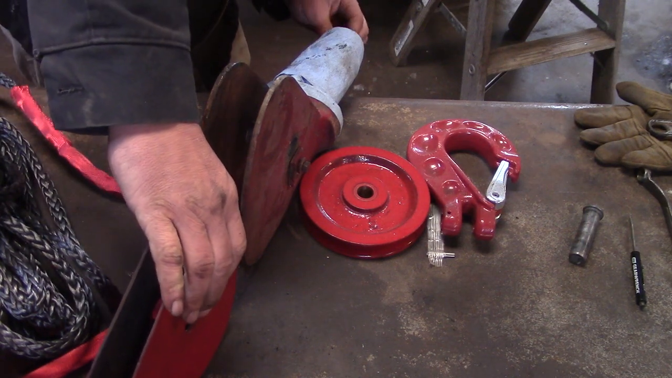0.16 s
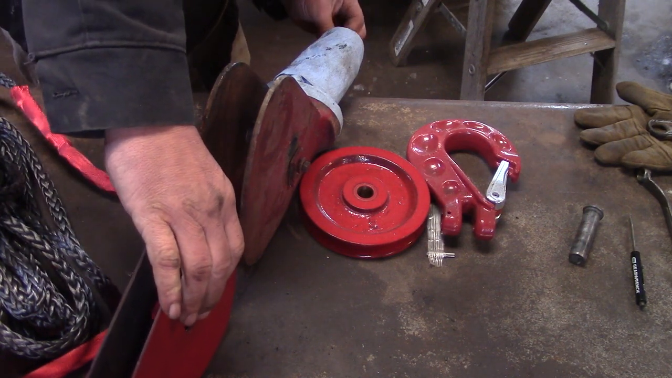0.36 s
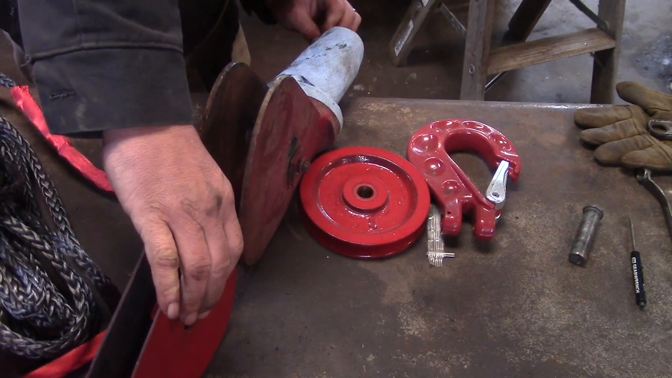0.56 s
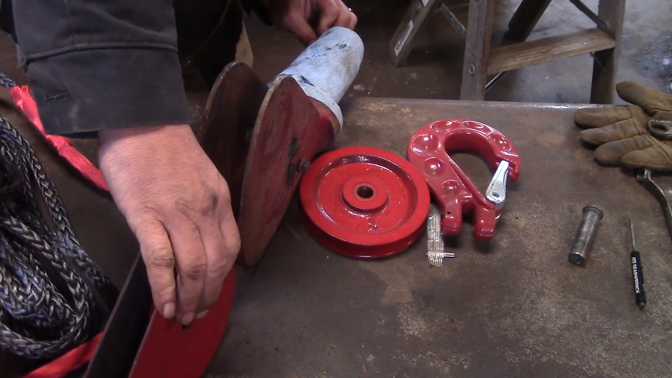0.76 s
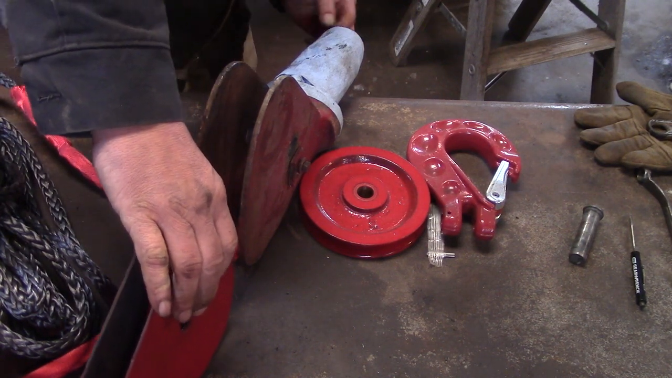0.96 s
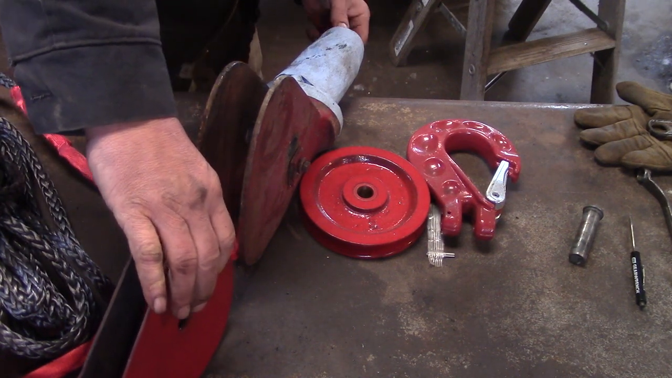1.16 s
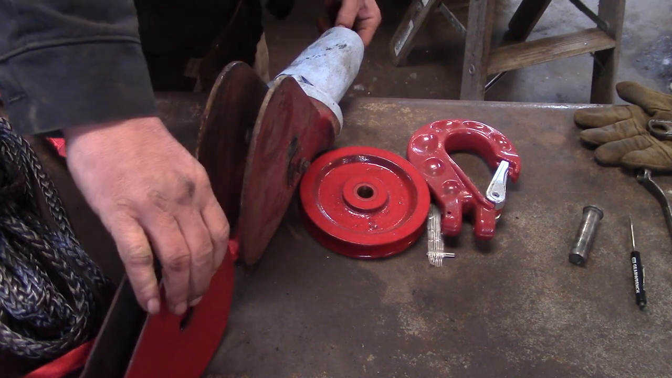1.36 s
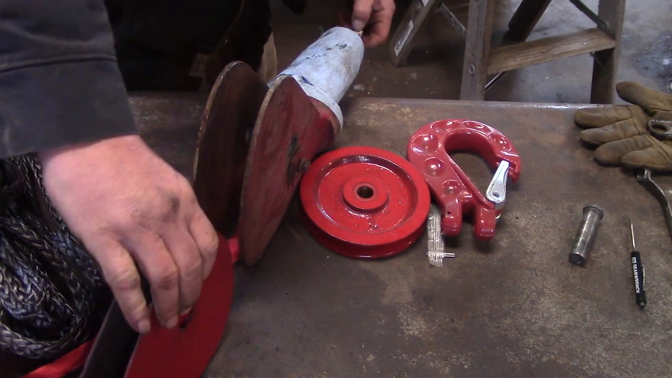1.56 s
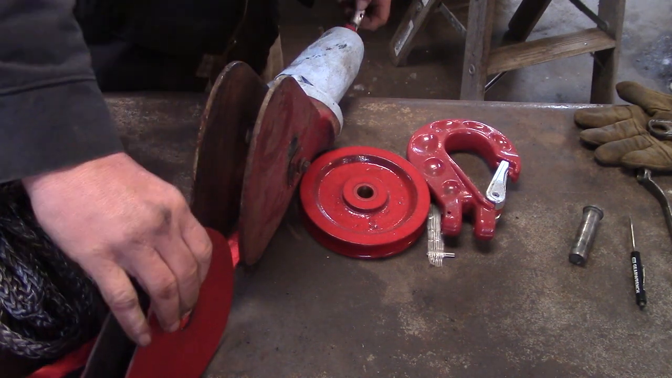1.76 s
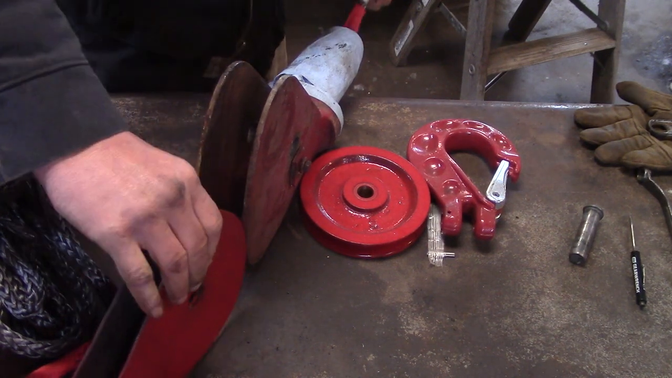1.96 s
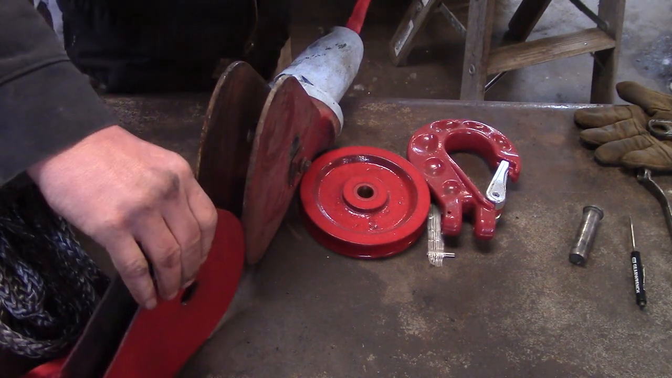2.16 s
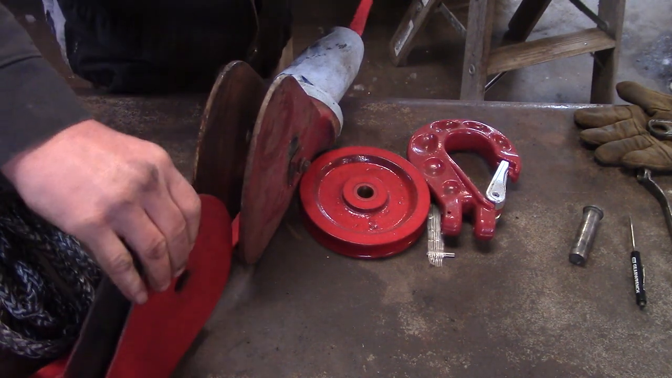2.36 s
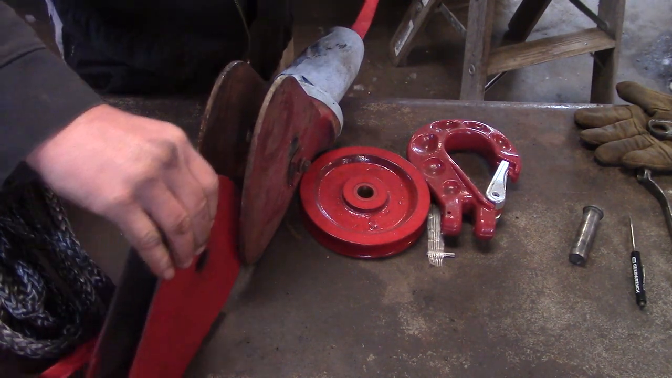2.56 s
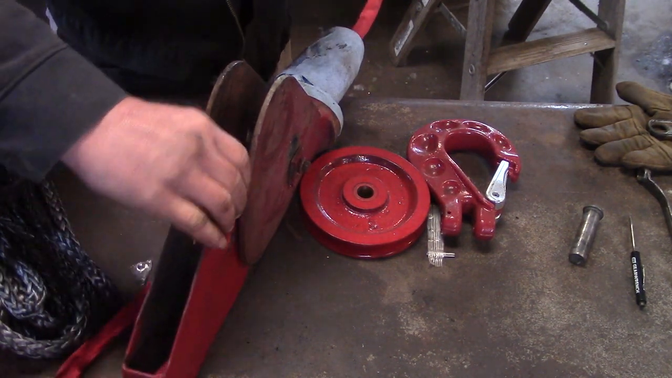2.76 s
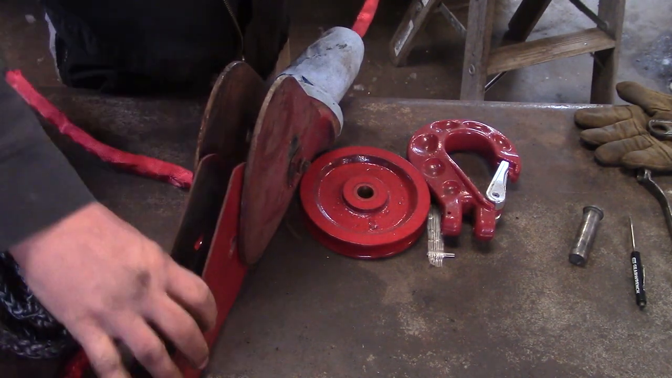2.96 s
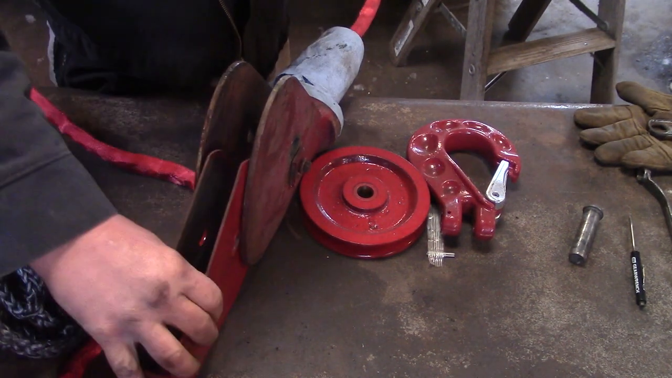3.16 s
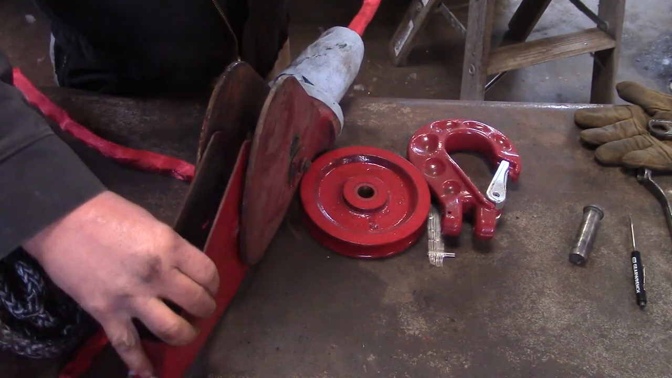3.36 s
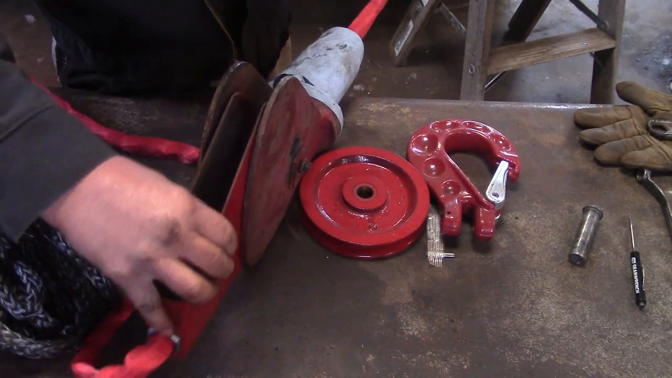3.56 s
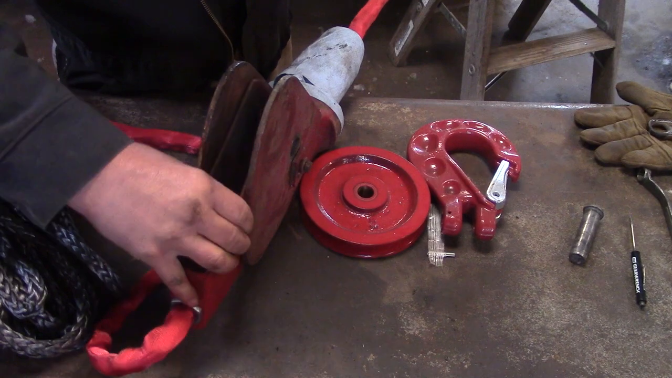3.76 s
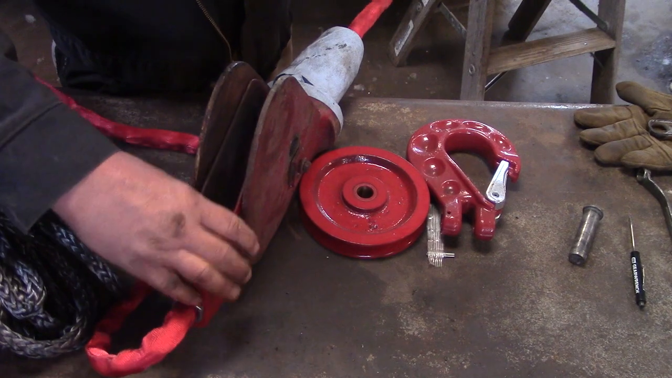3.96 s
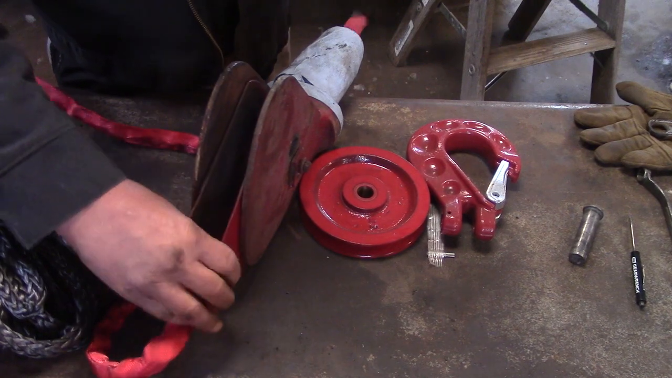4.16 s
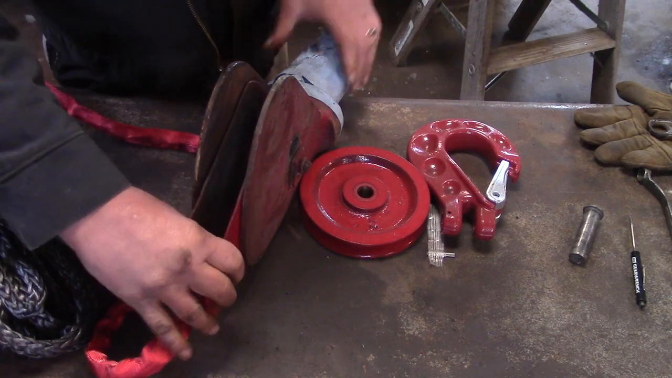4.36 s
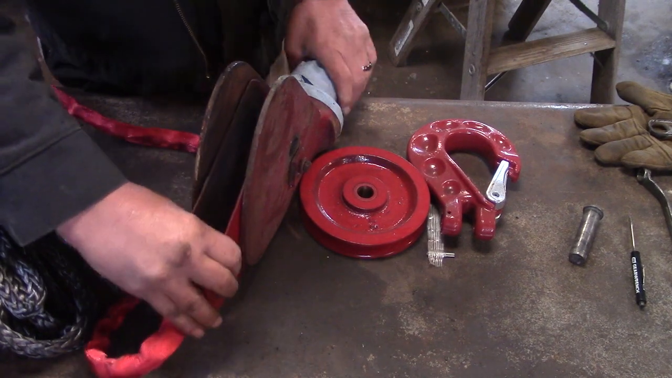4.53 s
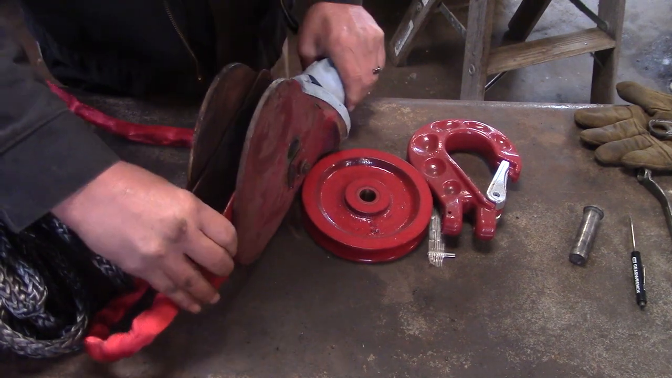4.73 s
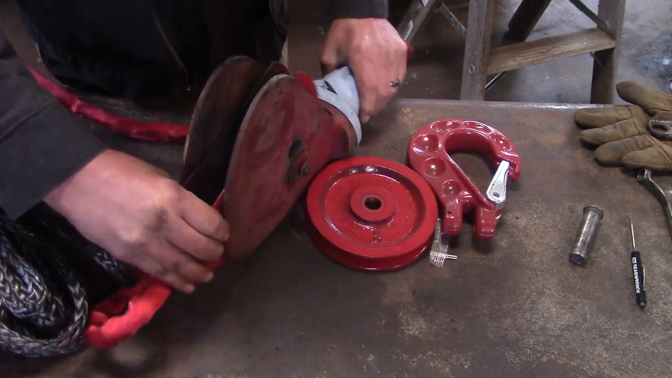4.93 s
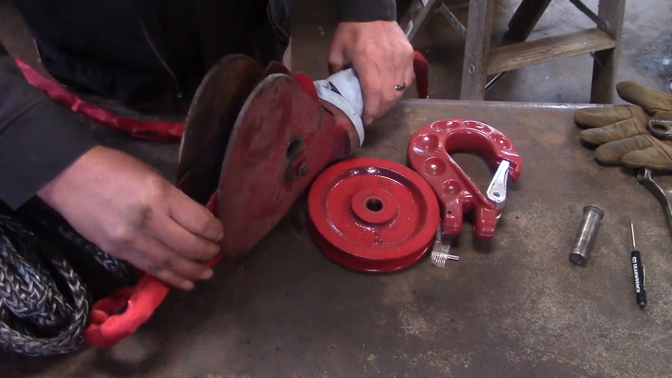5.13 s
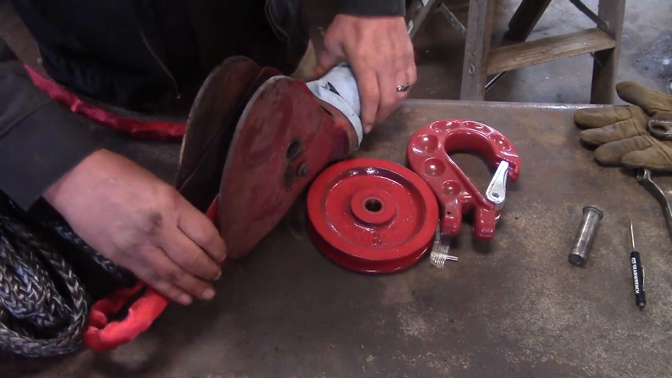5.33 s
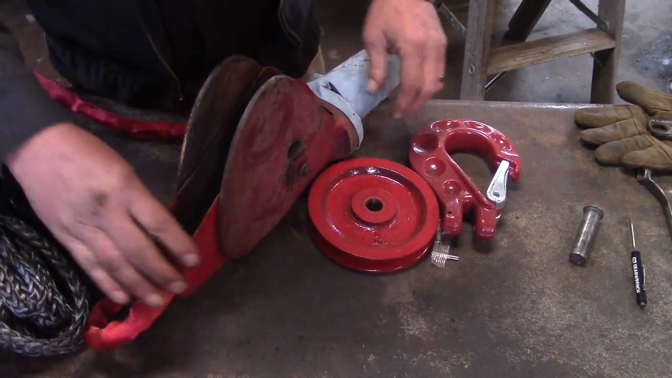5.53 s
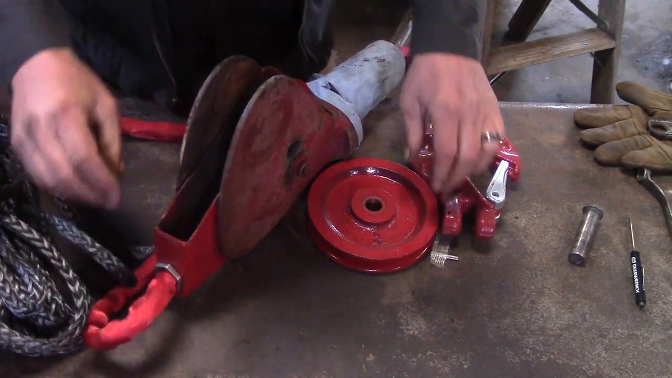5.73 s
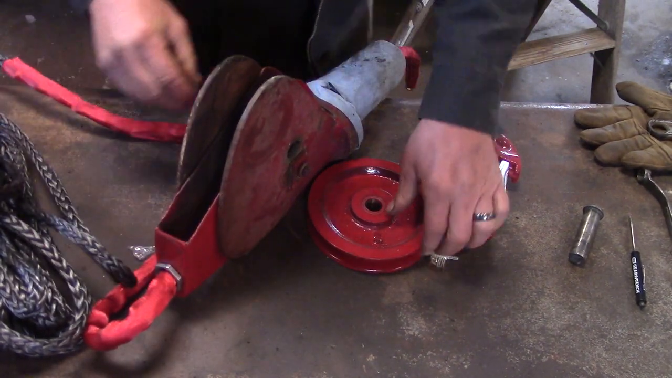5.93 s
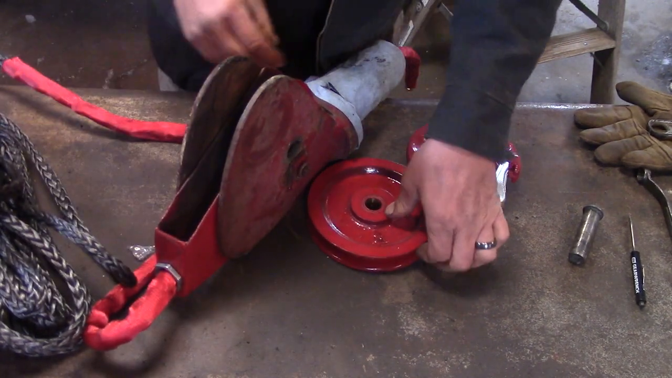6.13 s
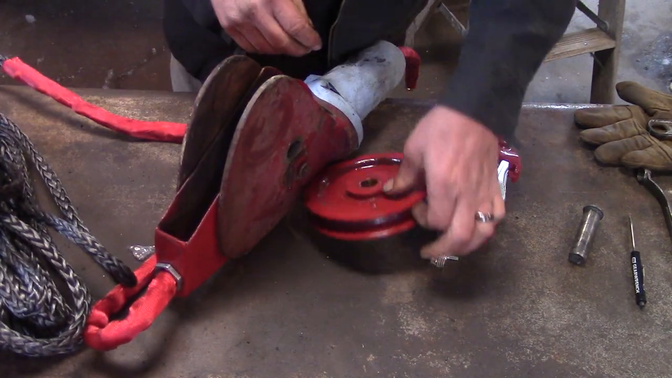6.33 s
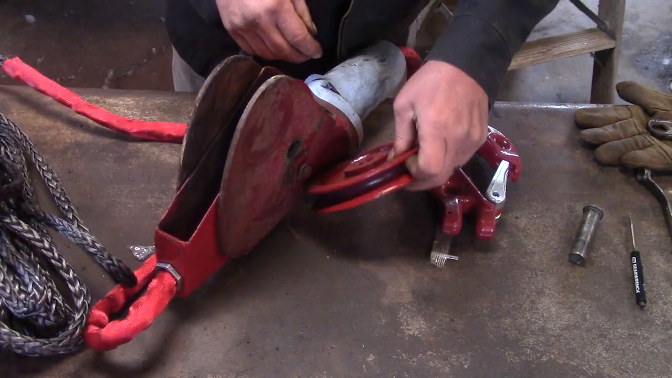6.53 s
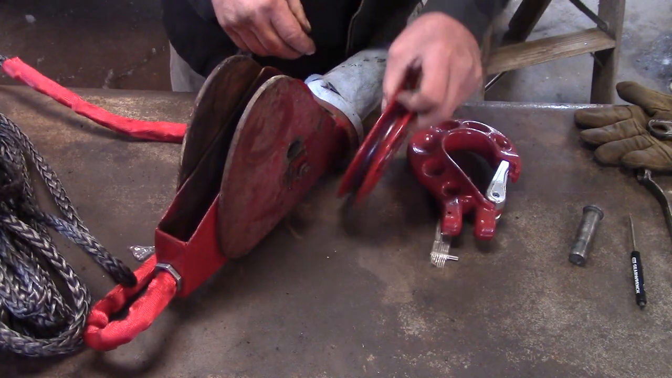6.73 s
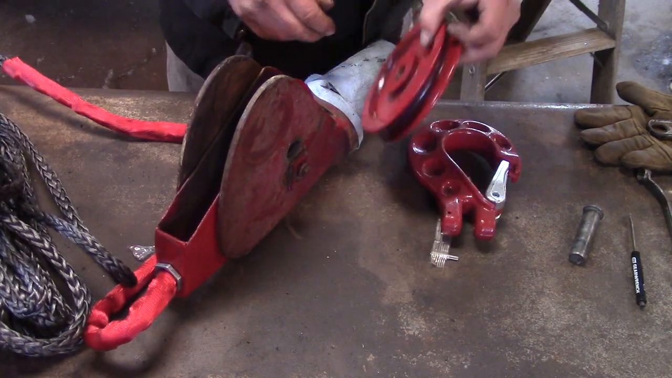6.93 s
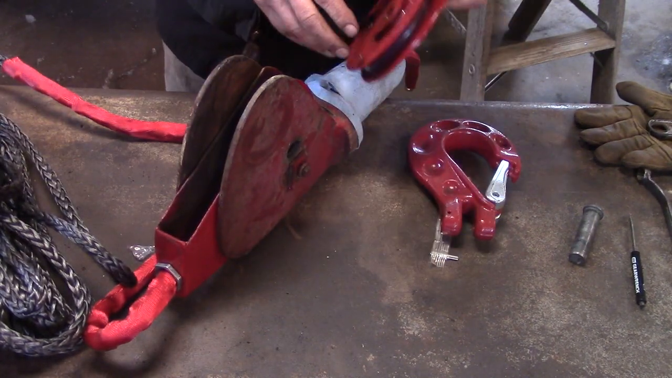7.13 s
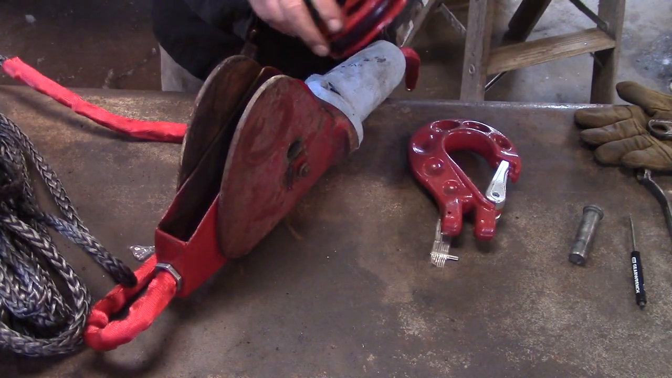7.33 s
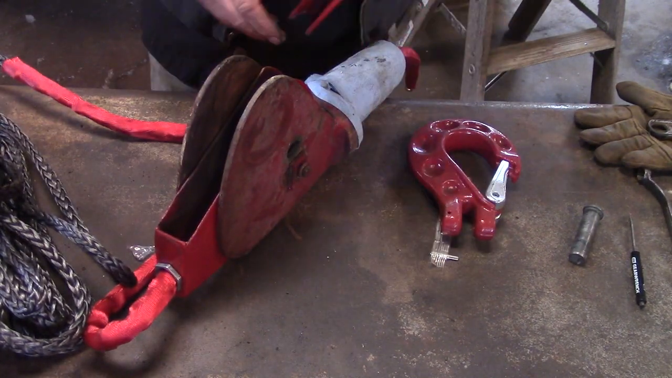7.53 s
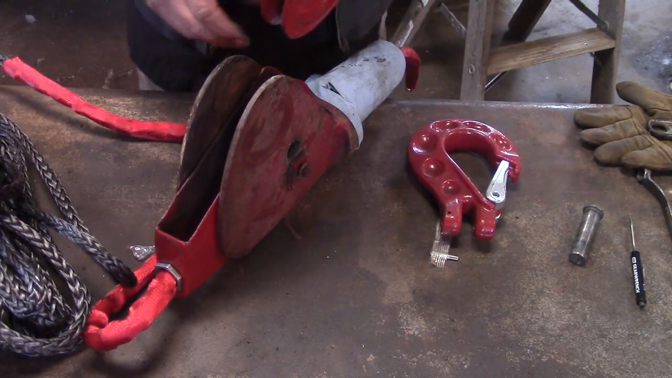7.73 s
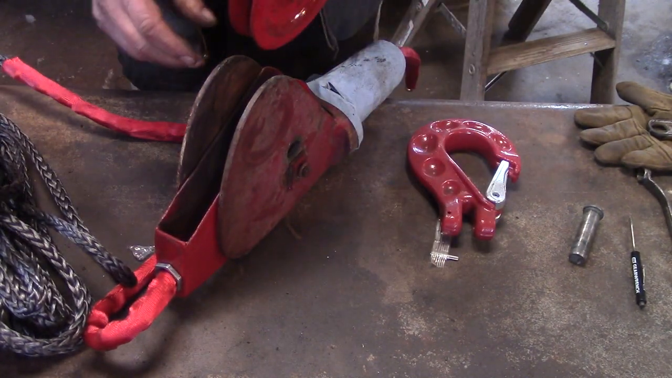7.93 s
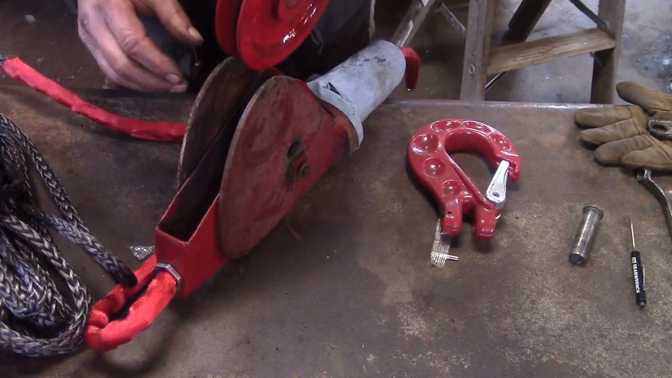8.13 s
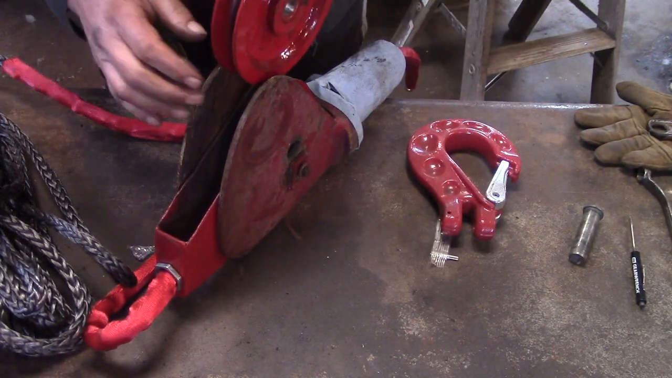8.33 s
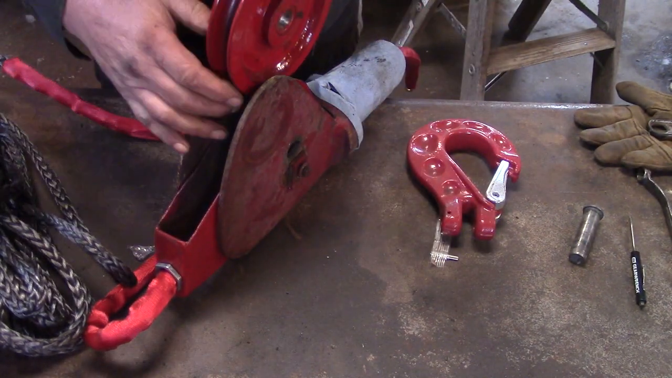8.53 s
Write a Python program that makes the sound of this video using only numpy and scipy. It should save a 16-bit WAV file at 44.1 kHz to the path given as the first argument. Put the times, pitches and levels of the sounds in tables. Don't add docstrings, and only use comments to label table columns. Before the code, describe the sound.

Steel rigging parts scrape and clang together on a steel bench in a quiet workshop, then a pulley wheel slides, squeaks briefly and lifts with clinks.

```python
import sys
import numpy as np
from scipy import signal
from scipy.fft import rfft, irfft
from scipy.io import wavfile
from scipy.ndimage import uniform_filter1d

SR = 44100
rng = np.random.default_rng(int(sys.argv[2]) if len(sys.argv) > 2 else 0)


def field_ratio(decibels):
    return 10 ** (np.asarray(decibels, dtype=float) / 20)


def to_wav(sig):
    pcm = np.clip(np.atleast_2d(sig), -1, 1) * 32767
    pcm = np.round(pcm).astype(np.int16)
    wavfile.write(sys.argv[1], SR, pcm.T)


N = 378819

# f/Hz, level/dB per Hz
AIR_SPECTRUM = [(30, -23.5), (200, -4), (700, -5), (2850, -16.5), (3930, -18), (9300, -28.5),
                (11800, -29.5), (15400, -33.5), (15800, -61)]
# f/Hz, side minus mid level/dB
AIR_WIDTH = [(60, -8.5), (180, -9.5), (550, -9), (1650, -11), (4970, -11), (15000, -19)]
# t/s, weight level/dB, sliding speed level/dB
DRAGS = [
    [(0.0, -61, -72), (.366, -50, -70), (.576, -83, -69), (.922, -89, -73), (1.118, -55, -74),
     (1.58, -57.5, -69), (1.66, -62.5, -57), (1.8, -63.5, -60)],
    [(1.82, -68.5, -63.5), (1.94, -33.5, -42), (2.09, -30, -49), (2.41, -51.5, -76.5)],
    [(2.57, -24.5, -58.5), (2.66, -26, -34), (2.74, -20, -29.5), (2.86, -15, -42), (3.0, -30.5, -48.5),
     (3.5, -43, -56)],
    [(3.78, -36.5, -52.5), (4.07, -40, -54.5), (4.17, -30, -59.5), (4.32, -45.5, -69), (4.49, -71, -58)],
    [(4.52, -50.5, -54.5), (4.922, -30.5, -45), (5.1, -28.5, -38.5), (5.2, -39.5, -55.5),
     (5.308, -24.5, -43.5), (5.44, -48, -66), (5.6, -82, -78)],
    [(5.62, -91, -70), (5.738, -43, -52), (5.9, -53.5, -65.5)],
    [(6.03, -56, -69.5), (6.146, -39, -47.5), (6.378, -37, -55.5), (6.502, -50, -61.5), (7.0, -53.5, -69)],
]
# f/Hz, level/dB per Hz
SCRAPE_SPECTRUM = [(290, -27), (500, 1), (914, -9.5), (1710, -3), (3250, -13), (6000, -27), (7800, -57.5),
                   (13200, -120)]
# f/Hz, level/dB per Hz
HISS_SPECTRUM = [(1760, -36.5), (3000, -4.5), (3390, 0), (8070, -4), (8820, -3), (10200, -6.5), (14700, -7),
                 (15500, -31.5)]
HIGH_HZ = [4980, 5250, 5720, 5920, 6150, 6890, 7530, 7970, 9330, 9670, 10500]
ROPE_SNAPS = [.155, .305, .51, .66, .675, .73, .78, .79, .82, .835, .845, .87]
# t/s, peak level/dB, brightness/dB per octave
TICKS = [(.331, -49, 8), (0.6508, -38.5, 3), (1.5415, -40.5, 3), (1.8933, -34, 8.5), (2.168, -29.5, 3.5),
         (2.873, -18, 11), (2.955, -18, -3), (2.8902, -15.5, -1), (2.917, -11, -5.5), (3.069, -27, 7.5),
         (3.089, -22.5, -4), (3.118, -18, -5), (4.5018, -44.5, -3.5), (4.6443, -29.5, -4),
         (4.7004, -21, 13), (4.78, -41.5, 0), (4.8156, -25.5, 1), (4.89, -26.5, 1), (4.9721, -19.5, 8.5),
         (4.997, -11, -5.5), (5.0736, -18.5, -6.5), (5.0883, -19, 4.5), (5.2295, -20, 3),
         (5.289, -9.5, 12.5), (5.309, -18, -10), (5.3914, -32, 10.5), (5.6742, -33.5, -7.5),
         (2.024, -28, 2), (2.571, -30.5, -1), (2.588, -27.5, 9), (2.688, -22, -0.5), (2.7096, -20, -10),
         (3.19, -19, -11.5), (3.29, -17.5, -5.5), (3.388, -36, 7), (3.798, -26.5, 1), (3.735, -41, 4),
         (4.252, -36, 0), (4.346, -45, 10), (5.195, -36, 1), (6.1463, -54, 0), (6.1867, -42, -1.5),
         (6.619, -52, -11)]
# t/s, peak level/dB
CLINKS = [(4.779, -27.5), (4.97, -23), (6.6616, -51), (6.775, -65), (7.2658, -53.5), (7.4341, -54),
          (6.2015, -40), (6.2356, -34), (6.269, -30.5), (6.291, -46), (6.3129, -31.5), (6.324, -32),
          (6.3653, -34), (6.392, -37), (6.428, -29), (6.441, -20), (6.473, -27.5), (6.7, -39.5),
          (6.72, -32.5), (6.738, -29), (6.245, -42), (6.277, -56), (6.335, -45), (6.345, -50), (6.377, -42),
          (6.405, -50), (6.6511, -59), (6.71, -38), (6.756, -40)]
# f/Hz, level/dB, t60/s
PIN_MODES = [(3924, 8.5, 0.032), (6170, -8, 0.049), (8760, -8, 0.09), (9810, -12, 0.067),
             (11360, -5, 0.027), (12230, -13, .03), (13400, -9.5, 0.028), (14090, -3, 0.031),
             (14900, -11.5, 0.039), (10500, -12.5, 0.036)]
# t/s, f/Hz, peak level/dB, t60/s
LIGHT_CONTACTS = [(1.895, 12400, -53.5, .3), (1.895, 6890, -45, 0.27), (1.923, 10500, -44, 0.46),
                  (1.897, 6170, -49, 0.6), (1.978, 5740, -19.5, 0.12), (1.98, 4662, -26.5, 0.29),
                  (2.024, 11400, -47, .2), (2.17, 7500, -41, 0.082), (1.9, 5350, -49, .8),
                  (2.312, 5400, -39.5, 0.16), (2.326, 8000, -49, 0.058), (2.384, 11800, -31, 0.25),
                  (2.384, 5200, -19, 0.3), (2.384, 8100, -32, 0.24), (2.384, 6040, -25, 0.74),
                  (2.384, 10500, -25, 0.21), (2.531, 9900, -35, 0.081), (2.531, 7530, -39, .2),
                  (2.571, 7590, -36, 0.28), (2.571, 8500, -37, 0.14), (2.571, 5640, -33, 0.22),
                  (2.588, 10560, -36, 0.16), (2.575, 3880, -24.5, .12), (2.652, 9300, -45, 0.13),
                  (2.682, 12500, -46, .12), (2.688, 8400, -36, .15), (2.712, 9640, -39, .15),
                  (2.712, 13800, -47.5, 0.11), (2.71, 3880, -16, .12), (2.735, 5560, -21, 0.11),
                  (2.878, 8500, -40.5, 0.13), (2.955, 8500, -50, .2), (2.955, 10200, -51, .1),
                  (3.07, 10200, -47, .2), (3.199, 5350, -20, 0.068), (3.445, 8240, -44, 0.064),
                  (3.485, 5970, -40, 0.29), (3.485, 13200, -35, .08), (3.582, 5670, -40, 0.21),
                  (3.757, 4700, -22, 0.067), (3.865, 9850, -39.5, 0.13), (4.226, 8000, -57, .08),
                  (4.252, 7250, -55, 0.071), (4.252, 10900, -52, .08), (4.252, 11900, -54, .08),
                  (4.645, 6960, -52, 0.21), (4.645, 8820, -43.5, 0.27), (5.292, 10300, -38, 0.11),
                  (5.392, 12700, -48, 0.072), (5.392, 8930, -43, 0.073),
                  (1.936, 742, -26.5, 0.78), (1.98, 2325, -22.5, 0.46), (1.98, 1900, -22.5, 0.47),
          (2.02, 548, -17.5, 0.21), (2.005, 874, -5.5, 0.41), (2.04, 1680, -20.5, 0.25),
          (2.08, 2132, -20, .15), (2.328, 522, -23.5, 0.27), (2.384, 3461, -22, 0.52),
          (2.384, 1850, -21, 1), (2.531, 2962, -26.5, 0.11), (2.66, 130, -32, 0.27),
          (2.63, 3880, -31.5, 0.23), (2.728, 3305, -17, 0.16), (2.687, 3305, -21, 0.31),
          (2.763, 870, -8, 0.18), (2.883, 355, -9, 0.28), (2.965, 1138, -24.5, 0.46),
          (3.065, 268, -16.5, 0.36), (3.18, 201, -19.5, 0.066), (3.21, 1747, -21, 0.25),
          (3.21, 4130, -24, 0.22), (3.301, 882, -23.5, 0.36), (3.33, 1510, -42, 0.93),
          (3.49, 3480, -36, 0.18), (3.63, 796, -25.5, 0.17), (2.39, 135, -30, 0.97),
          (3.735, 3450, -34, 0.058), (3.866, 1138, -11.5, 0.53), (3.933, 797, -10, 0.2),
          (4.11, 1152, -25.5, 0.5), (4.156, 1497, -29, 0.47), (6.722, 3020, -36.5, 0.2),
          (4.219, 1687, -22.5, 0.18), (4.655, 820, -30.5, 0.18), (2.328, 875, -24, 0.17),
          (4.817, 314, -23, 0.15), (4.985, 315, -13, 0.33), (4.995, 700, -14.5, 0.23),
          (5.235, 877, -31, 0.21), (5.292, 328.7, -10.5, 0.08), (5.291, 508, -13.5, 0.077),
          (5.391, 228, -30, 0.32), (6.618, 530, -30, 0.079), (.2, 737, -47, 0.32), (1.3, 764, -54, 0.24)]
SHY_HZ = [265, 315, 358, 1855, 1898, 2326, 3880, 4091, 4662]
# t/s, peak level/dB, t60/s, brightness/dB per octave
THUDS = [(.307, -31.5, 0.052, 0), (1.978, -13, 0.24, -2), (2.167, -16.5, 0.17, -11.5), (2.381, -18, 0.4, 0),
         (2.7627, 3.5, 0.22, -4.5), (2.812, -2, 0.12, 2), (2.8825, 0.5, 0.14, -5.5),
         (3.068, -19.5, 0.16, -10.5), (3.102, -10, 0.17, -14), (3.183, -12.5, 0.18, -6),
         (3.297, -15, 0.13, -4), (3.861, 4.5, 0.15, -4), (3.949, -3, 0.11, -1), (4.27, -20, 0.16, -3),
         (4.626, -23.5, 0.12, -17.5), (4.699, -16.5, 0.15, -10), (4.983, -3, 0.14, -3.5),
         (5.069, -15.5, 0.053, -27), (5.29, -10, 0.079, -10.5), (5.389, -22.5, 0.23, -5),
         (6.43, -14.5, 0.15, -0.5), (6.469, -23, 0.098, 6), (6.616, -38, 0.17, -17),
         (6.722, -21.5, 0.2, -1)]
# f/Hz, level/dB per Hz
BENCH_SPECTRUM = [(50, -43), (108, -13), (244, -7.5), (554, 0.5), (825, -1), (1100, -3), (3580, -7.5),
                  (11000, -48)]
# f/Hz, width/Hz, level/dB
BENCH_MODES = [(125, 30, -7), (220, 3.3, -4.5), (261.7, 6.1, 4), (363.5, 9.5, 2), (569, 150, -9.5),
               (855, 72, -2)]
# f/Hz, level/dB per Hz
CRACK_SPECTRUM = [(300, -22.5), (1200, 4.5), (4000, 7.5), (5500, 6), (16000, -12)]
FREE_HZ = [550, 795, 875, 1139, 1497, 1631, 1688, 2133, 2611, 2731, 2904, 2962, 3365, 5920]
# t60/s, level/dB struck at the rim, on the face, near the hub
FREE_MODES = [(0.21, -14, -2, -7.5), (0.2, -17.5, -16.5, -5.5), (0.6, -5.5, -22.5, -11),
              (0.44, -30.5, -14.5, -11.5), (0.77, -12.5, -10.5, -9.5), (.24, -11, -9.5, -21.5),
              (0.43, -18, -12, -14), (0.3, -11.5, -13, -6), (0.17, -8.5, -19.5, -19),
              (0.28, -20.5, -29.5, -4.5), (0.14, -30.5, -2.5, -2), (0.14, -10, -12.5, -9.5),
              (0.55, -34.5, -14.5, -29.5), (0.18, -42, -13, -36)]
GRIPPED_HZ = [550, 795, 875, 1139, 1732, 2133, 2558, 2731, 2904, 2962, 3301, 3365, 3628, 3712]
# t60/s, level/dB struck at the rim, on the face, near the hub
GRIPPED_MODES = [(0.095, -0.5, 2, 6), (0.23, -7, -12.5, -3), (0.54, -11.5, -25.5, -4),
                 (0.37, -10.5, -9.5, -7.5), (0.21, -6, -10, -10), (0.19, -18.5, -19, 4),
                 (.24, -23, -1, -20), (0.042, 2, -31.5, -10.5), (0.16, -19.5, -15.5, -0.5),
                 (0.14, -3, -20, -16), (0.3, -10.5, -5.5, -30), (0.62, -21.5, -17, -9.5),
                 (0.3, -15.5, -8, -13.5), (0.28, -9.5, -5.5, -22)]
SEATED_HZ = [550, 795, 875, 1139, 1631, 1688, 1732, 2133, 2611, 2731, 2962, 3301, 3459, 4653]
# t60/s, level/dB struck on the face, at the rim
SEATED_MODES = [(0.21, -9, -13), (0.33, -14, -12.5), (0.61, -16.5, -9), (0.3, -31, -8), (.17, -19, -13),
                (0.26, -12, -6.5), (0.17, -5.5, -6.5), (0.15, -6.5, -16.5), (0.027, 4, -23.5),
                (0.17, -15.5, -12.5), (0.14, -8.5, -15), (0.18, -10, -33), (0.059, 0, -7),
                (0.1, -24, -36.5)]
# t/s, crack peak level/dB, ring level/dB, brightness/dB per octave, crack t60/s
FREE_STRIKES = [
    [(1.9394, -37.5, -3, 1.5, 1), (1.9784, -4, 3.5, -6.5, 0.25), (2.33, -33, 2.5, 3.5, 0.2)],
    [(2.382, 2.5, -11, 2.5, 0.087), (2.4194, -11.5, 0, -2, 0.39)],
    [(2.5316, -9.5, -7.5, 0.2, 0.079), (2.5794, -20, -7.5, -3, 0.22)],
]
GRIPPED_STRIKES = [
    [(2.6294, -26.5, -10, -13, 0.21), (2.6673, -21.5, 3.5, -4, 0.11), (2.7044, -20.5, 2, 2, 0.17),
     (2.7394, -12.5, -4.5, -2, 0.5)],
    [(3.1991, -5, -14.5, -0.78, 0.07), (3.2086, -7.5, -17, -1.1, 0.11)],
    [(3.4465, -21, -6.5, 0.5, 0.054), (3.4835, -14, -20, 3.1, 0.079)],
]
SEATED_STRIKES = [
    [(3.5798, -8.5, -5, -4.5, 0.079), (3.7554, -10.5, -6, -7.5, 0.14)],
    [(3.8631, -8, -6.5, -3, 0.14), (3.8874, -5, -11, -9.5, 0.4), (3.9074, -5.5, -15.5, -2, 0.072),
     (3.9294, -8.5, -5, -7.5, 0.23), (3.9544, -26, -47.5, 1.5, 0.25), (4.0901, -20, -2, -10, 0.14),
     (4.154, -10.5, 1, -3.5, 0.099), (4.2273, -30.5, -2, -3.5, 0.24)],
]
# t/s, f/Hz, level/dB
SQUEAK = [
    (5.935, 4270, -74),
    (5.958, 4316, -63),
    (5.968, 4350, -68),
    (5.982, 4330, -70),
    (6.0, 4240, -58),
    (6.026, 4410, -62),
    (6.042, 4360, -59),
    (6.062, 4150, -68),
    (6.1, 4150, -86),
]
# f/Hz, level/dB, t60/s
PULLEY_MODES = [(503, 4.5, 0.056), (700, -33, 0.46), (1117, -7, 0.43), (1174, -15, 0.26), (1812, -2, 0.046),
                (2170, -13.5, 0.32), (2660, -22, 0.4), (3350, -47, 5.0)]
# t/s, peak level/dB
PULLEY_KNOCKS = [
    (6.328, -28),
    (6.429, -9.5),
    (6.47, -27),
    (6.617, -51),
    (6.712, -24),
    (6.741, -19),
]
# f/Hz, t60/s
SHOP_T60 = [(100, 0.38), (500, 0.5), (2000, 0.4), (6000, 0.12), (14000, 0.033)]
# f/Hz, side minus mid level/dB
ECHO_WIDTH = [(60, -24), (180, -56.5), (550, -25.5), (1200, -18), (4970, -10.5), (15000, -4.5)]
# f/Hz, level/dB
MICROPHONE = [(45, -31), (105, -5), (150, -5), (8000, 0.5), (12000, -3), (15300, -13), (15800, -53)]


def evened(x):
    return x / np.sqrt(np.mean(x ** 2) + 1e-20)


def read(points, hz):
    f, value = np.transpose(points)
    return np.interp(np.log(hz + 1), np.log(f + 1), value)


def add(mix, s, sound):
    part = mix[round(s * SR):][:len(sound)]
    part += sound[:len(part)]


def coloured(x, points, tilt_db=0.):
    hz = np.fft.rfftfreq(len(x), 1 / SR)
    gain_db = read(points, hz) + tilt_db * np.log2(hz / 1000 + 0.47)
    return irfft(rfft(x) * field_ratio(gain_db), len(x))


def resonate(x, hz, width_hz):
    return signal.lfilter(*signal.iirpeak(hz, hz / width_hz, SR), x)


def ring(hz, db, t60, size, turns=None):
    pole = 2j * np.pi * hz - np.log(1000) / t60
    turns = rng.random(len(hz)) if turns is None else turns
    coarse = np.exp(np.outer(np.arange(0, size, 128) / SR, pole))
    fine = np.exp(np.outer(pole, np.arange(128) / SR))
    sound = ((coarse * field_ratio(db) * np.exp(2j * np.pi * turns)) @ fine).real.ravel()
    rise_s = 0.0012
    return sound * (1 - np.exp(-np.arange(len(sound)) / (rise_s * SR)))


def burst(points, tilt_db, t60, rise_s):
    t = np.arange(16384) / SR
    start = 1 - np.exp(-t / rise_s)
    noise = rng.standard_normal(len(t))
    crack = evened(coloured(noise, points, tilt_db)) * field_ratio(-60 * t / max(0.17 * t60, .01))
    place, strength, life = rng.random((3, 300))
    hz = 105 * 143 ** (place ** .6)
    db = read(points, hz) + tilt_db * np.log2(hz / 1000 + 0.12) + 11 * strength
    mode_t60 = t60 * (1.15 + 1.29 * life) * (hz / 1000 + 1.2) ** -.35
    minor = ring(hz, db, mode_t60, size=len(t))
    minor *= field_ratio(4) / np.sqrt(np.sum(field_ratio(2 * db)) / 2)
    return start * (crack + minor) / 3


def air():
    mid, side, slow = rng.standard_normal((3, N))
    slow = uniform_filter1d(uniform_filter1d(slow, size=4000), size=4000)
    swell = field_ratio(.6 * evened(slow))
    mid = coloured(mid, AIR_SPECTRUM)
    side = coloured(coloured(side, AIR_SPECTRUM), AIR_WIDTH)
    return field_ratio(-55.5) * swell * np.array([mid, side]) / mid.std()


def bench(x):
    boom = sum(field_ratio(db) * resonate(x, hz, width_hz) for hz, width_hz, db in BENCH_MODES)
    return x + field_ratio(2.0) * boom


def grit(per_s, spread_db):
    strength = field_ratio(spread_db * np.minimum(rng.exponential(1, N), 3))
    grains = strength * (rng.random(N) < per_s / SR)
    jumps = signal.lfilter([1], [1, -np.exp(-1 / (.004 * SR))], grains)
    return rng.standard_normal(N) * (.55 + evened(jumps))


def drags():
    t = np.arange(N) / SR
    s, weight_db, speed_db = np.transpose(np.concatenate(DRAGS))
    rumble_db = np.interp(t, s, weight_db, right=-120)
    hiss_db = np.interp(t, s, speed_db, right=-120)
    scrape_db = 13 + 0.53 * rumble_db + 0.74 * hiss_db

    rumble = bench(coloured(grit(110, 2.6), BENCH_SPECTRUM, -4.5))
    rough, fine = grit(240, 3), grit(160, 4.5)
    scrape = field_ratio(scrape_db) * evened(coloured(rough, SCRAPE_SPECTRUM))
    modes = zip(FREE_HZ + GRIPPED_HZ[4:], FREE_MODES + GRIPPED_MODES[4:])
    plate_ring = sum(resonate(scrape, hz, 3.1 / t60 + 12) for hz, (t60, *_) in modes)

    hiss = evened(coloured(1.2 * rough + fine, HISS_SPECTRUM))
    high_ring = sum(resonate(hiss, hz, 13) for hz in HIGH_HZ)
    hiss = evened(hiss + field_ratio(5) * high_ring)
    return field_ratio(rumble_db) * evened(rumble) + scrape + field_ratio(-4) * plate_ring + field_ratio(hiss_db) * hiss


def ticks():
    out = np.zeros(N)
    hz, db, t60 = np.transpose(PIN_MODES)
    spectrum = [(800, -5.0), (2500, 7.0), (16000, -4.5)]  # f/Hz, level/dB per Hz
    contacts = TICKS + [(s, -44, 13) for s in ROPE_SNAPS]
    knocks = [(s, peak_db, -25.5, tilt_db, 0.11 * 2 ** (-0.12 * tilt_db)) for s, peak_db, tilt_db in contacts]
    clinks = [(s, peak_db, -3.5, 5.5 + 0.21 * (peak_db + 22), 0.054) for s, peak_db in CLINKS]
    for s, peak_db, pin_db, tilt_db, crack_t60 in knocks + clinks:
        add(out, s, field_ratio(peak_db) * burst(spectrum, tilt_db, crack_t60, rise_s=.0005))
        delays = np.r_[0, np.cumsum(rng.uniform(.004, .012, 2))]
        for bounce, late in enumerate(delays):
            where_db = 3 * rng.standard_normal(len(hz))
            mode_db = db + 1.1 * tilt_db * np.log2(hz / 6000) + where_db
            tone = ring(hz, mode_db, t60, size=6144)
            add(out, s + late, field_ratio(peak_db + pin_db - 7.0 * bounce) * tone)
    return out


def glances():
    out = np.zeros(N)
    known = np.array(FREE_HZ + GRIPPED_HZ + SEATED_HZ + SHY_HZ)
    for s, hz, peak_db, t60 in LIGHT_CONTACTS:
        nearest = known[abs(known - hz).argmin()]
        hz = nearest if abs(nearest / hz - 1) < .02 else hz
        pair = hz * np.array([1, 1 + .005 * rng.uniform(-2, 1.7)])
        in_step = rng.random(2) * [0, 1] + pair * round(s * SR) / SR
        tone = ring(pair, np.array([0, -7]), t60, size=16384, turns=in_step)
        add(out, s, field_ratio(peak_db) * tone)
    return out


def thuds():
    out = np.zeros(N)
    for s, peak_db, t60, tilt_db in THUDS:
        add(out, s, field_ratio(peak_db) * burst(BENCH_SPECTRUM, tilt_db, t60, rise_s=0.0011))
    return bench(out)


def plates():
    out = np.zeros(N)
    t = np.arange(32768) / SR
    grab_s = 2.53
    blows = np.array([row[0] for row in THUDS] + [grab_s])
    states = [(FREE_HZ, FREE_MODES, FREE_STRIKES), (GRIPPED_HZ, GRIPPED_MODES, GRIPPED_STRIKES),
              (SEATED_HZ, SEATED_MODES, SEATED_STRIKES)]
    for hz, modes, strikes in states:
        t60, *spots = np.transpose(modes)
        apart = rng.standard_normal(len(hz))
        hz = np.r_[hz, hz * (1 + .005 * (apart + np.sign(apart)))]
        is_twin = np.arange(len(hz)) >= len(modes)
        start = rng.random(len(hz)) * is_twin
        for spot_db, rows in zip(spots, strikes):
            mode_db = np.r_[spot_db, spot_db - 7]
            for s, peak_db, ring_db, tilt_db, crack_t60 in rows:
                add(out, s, field_ratio(peak_db) * burst(CRACK_SPECTRUM, tilt_db, crack_t60, rise_s=0.00023))
                in_step = start + hz * round(s * SR) / SR
                tone = ring(hz, mode_db, np.tile(t60, 2), size=len(t), turns=in_step)
                held_s = t - (blows[blows > s + .05].min() - s)
                choke_db = 109 * np.maximum(held_s, 0) + 5.5 * np.clip(held_s * 50, 0, 1)
                add(out, s, field_ratio(peak_db + ring_db - choke_db) * tone)
    return out


def squeak():
    out = np.zeros(N)
    s, hz, db = np.transpose(SQUEAK)
    t = np.arange(s[0], s[-1], 1 / SR)
    waver = 1 + 0.04 * uniform_filter1d(rng.standard_normal(len(t)), size=200)
    tone = np.sin(2 * np.pi * np.cumsum(np.interp(t, s, hz) * waver) / SR)
    level = np.sqrt(2) * field_ratio(np.interp(t, s, db))
    add(out, s[0], level * tone * signal.windows.tukey(len(t), .3))
    return out


def pulley():
    out = np.zeros(N)
    hz, db, t60 = np.transpose(PULLEY_MODES)
    for s, peak_db in PULLEY_KNOCKS:
        mode_db = db + 0.97 * rng.standard_normal(len(hz))
        tone = ring(hz, mode_db, np.minimum(t60, .2), size=8192)
        add(out, s, field_ratio(peak_db - 6.5) * tone)
    return out


def shop(x):
    taps = np.zeros((2, SR // 2))
    slots = np.arange(200, SR // 2 - 20, 20)
    at = slots + rng.integers(0, 20, (2, len(slots)))
    np.put_along_axis(taps, at, rng.choice([-1., 1.], at.shape), 1)
    hz, t, z = signal.stft(taps, SR, nperseg=256)
    decay = field_ratio(-60 * t / read(SHOP_T60, hz)[:, None])
    tail = signal.istft(z * decay, SR, nperseg=256)[1]
    return signal.fftconvolve(x[None], tail / np.linalg.norm(tail[0]), axes=1)[:, :N]


def scene():
    near = drags() + ticks() + glances() + thuds() + plates() + squeak() + pulley()
    direct = coloured(near, MICROPHONE)
    wet = shop(direct)
    mid = direct - field_ratio(-15) * wet[0]
    side = field_ratio(-14.0) * coloured(wet[1] - .6 * np.roll(direct, 9), ECHO_WIDTH)
    mid, side = np.array([mid, side]) + air()
    return np.array([mid + side, mid - side])


def top_cut(x):
    return signal.sosfilt(signal.butter(12, 15650, fs=SR, output="sos"), x)


def record(dry):
    power_db = 10 * np.log10(abs(uniform_filter1d((dry ** 2).mean(0), size=200)) + 1e-12)
    fall = np.arange(N) * 15.0 / SR
    held_peak_db = np.maximum.accumulate(power_db + fall) - fall
    over_db = np.maximum(held_peak_db + 13.0, 0)
    ducked = dry / field_ratio(0.18 * uniform_filter1d(over_db, size=100, origin=49))
    knee = 0.32
    over = np.maximum(abs(ducked) - knee, 0)
    bent = (1 - knee) * np.tanh(over / (1 - knee))
    held = np.sign(ducked) * (np.minimum(abs(ducked), knee) + bent)
    return top_cut(held)


dry = scene()
out = record(dry)
to_wav(out)
```